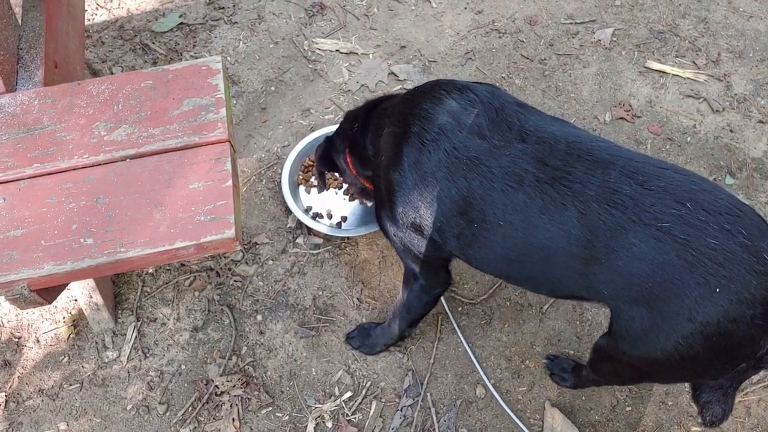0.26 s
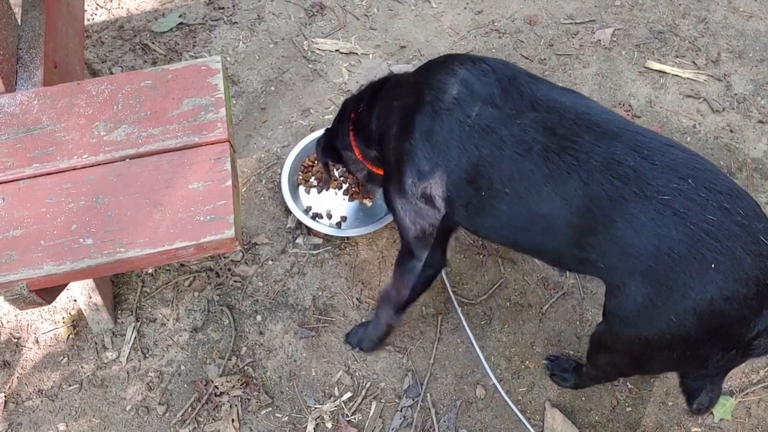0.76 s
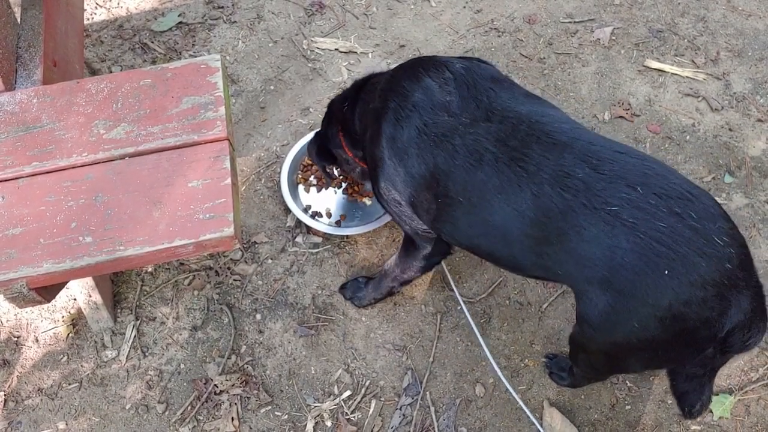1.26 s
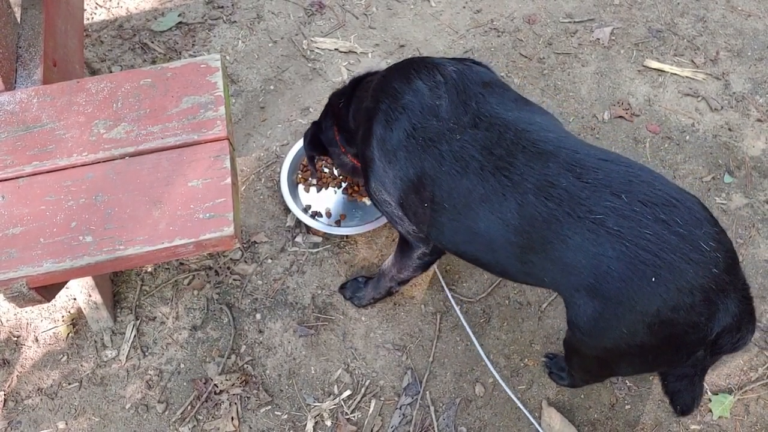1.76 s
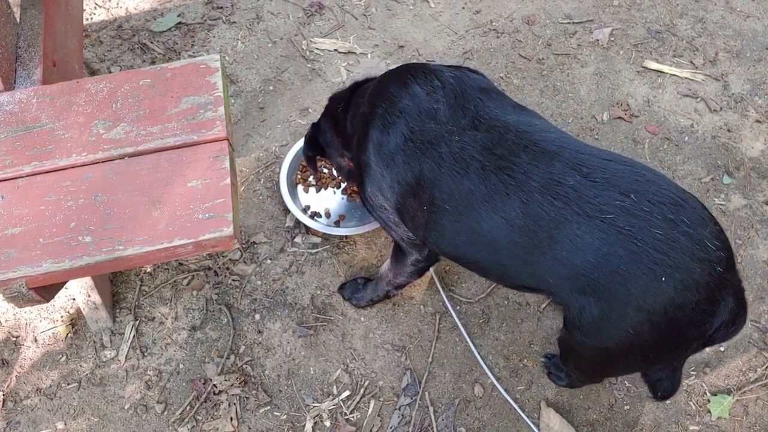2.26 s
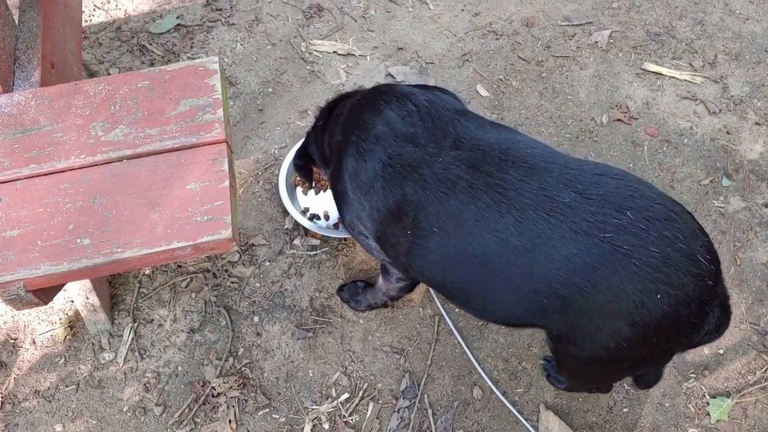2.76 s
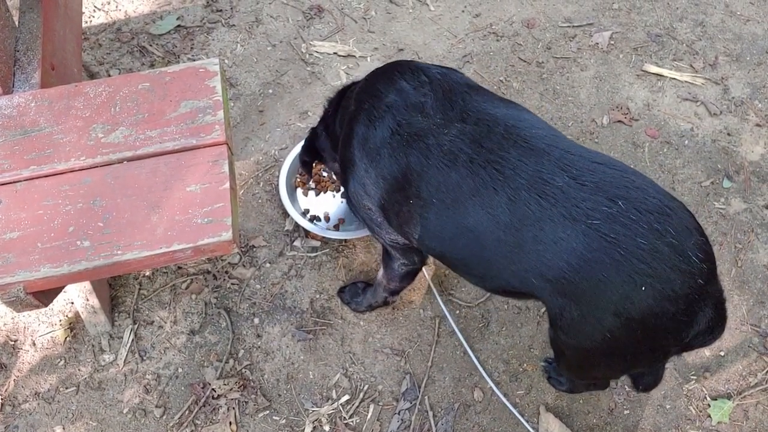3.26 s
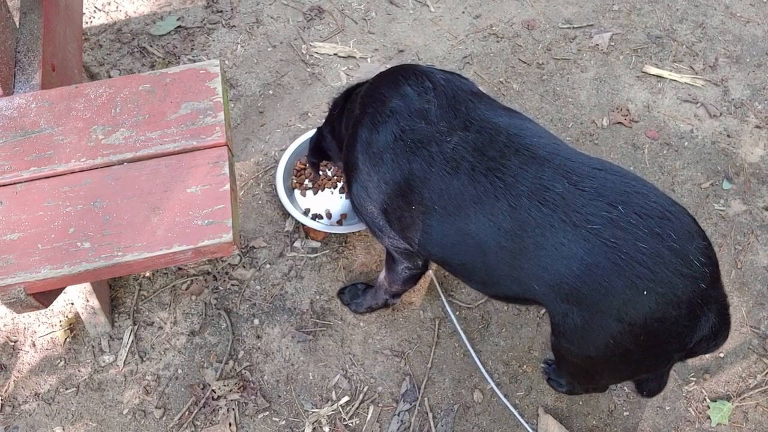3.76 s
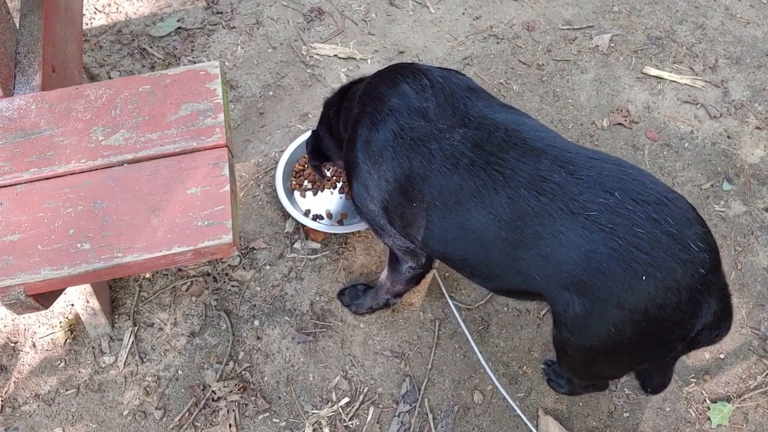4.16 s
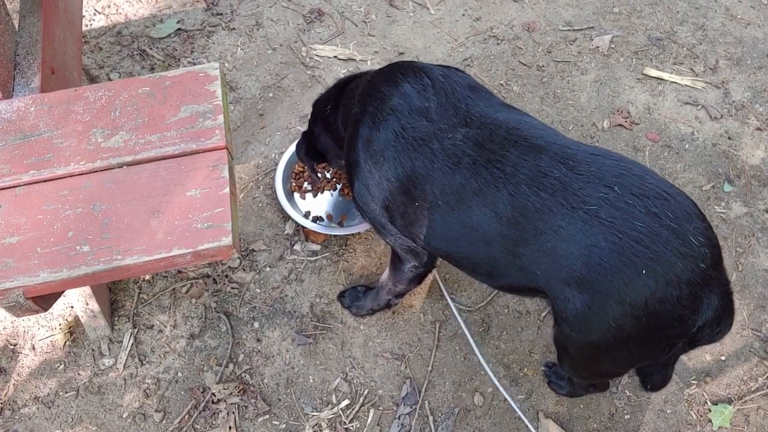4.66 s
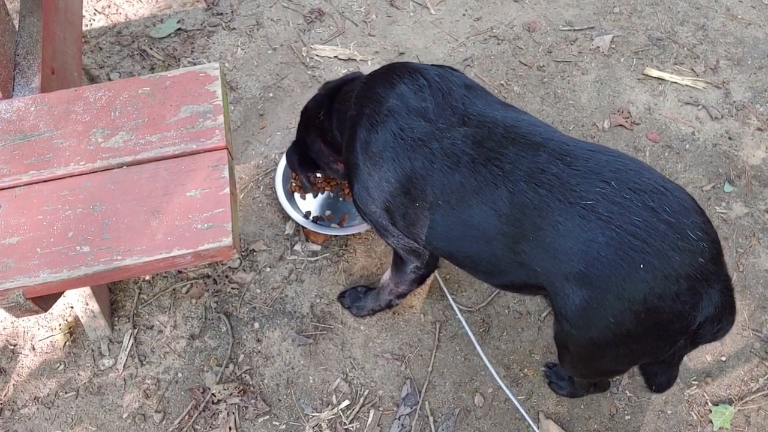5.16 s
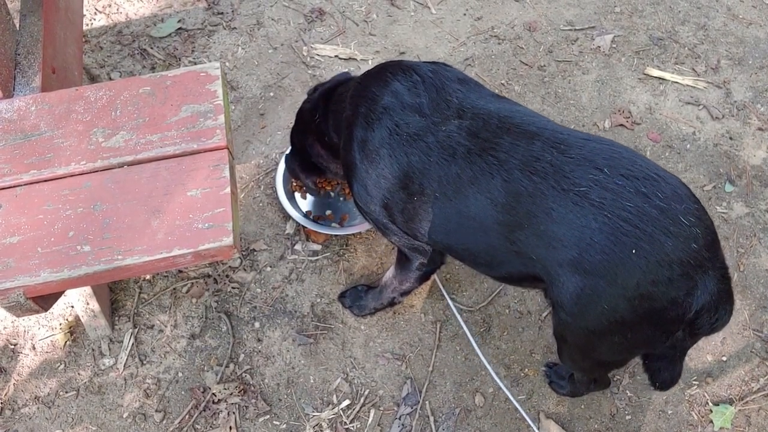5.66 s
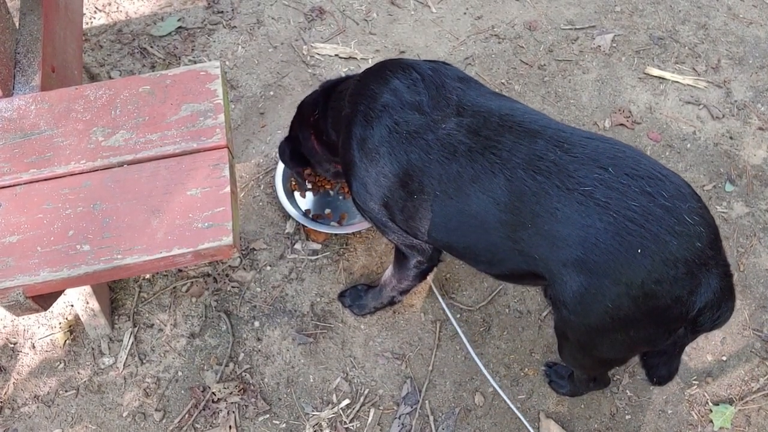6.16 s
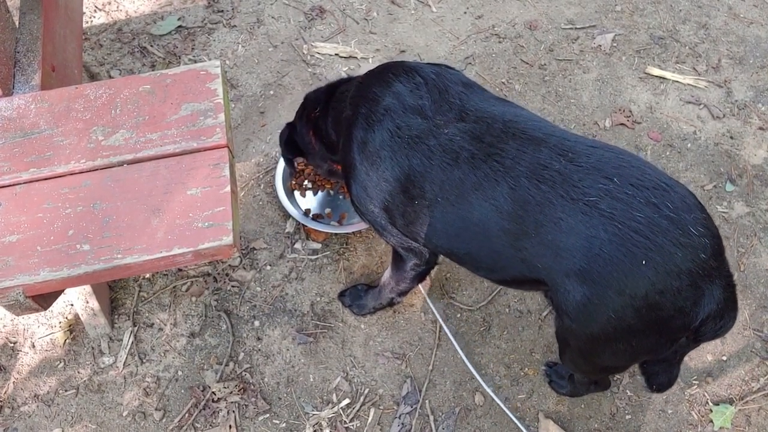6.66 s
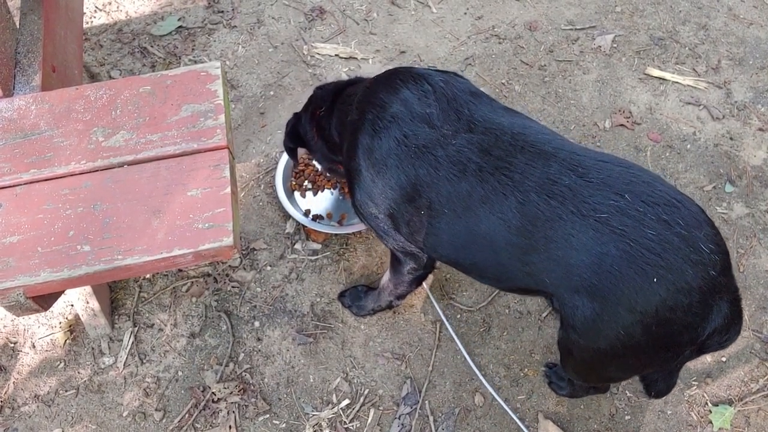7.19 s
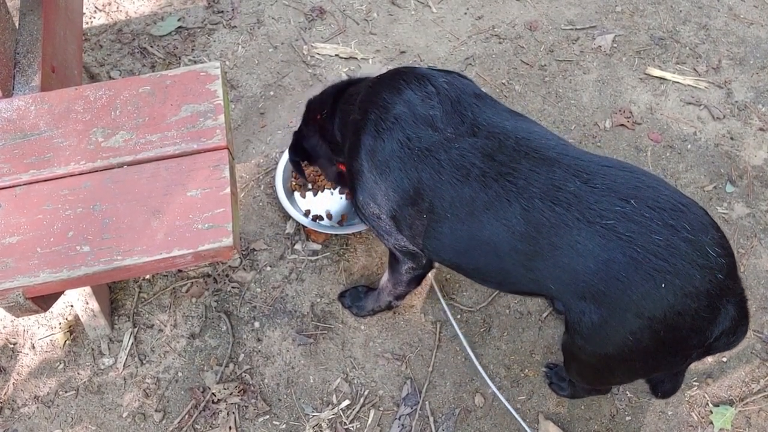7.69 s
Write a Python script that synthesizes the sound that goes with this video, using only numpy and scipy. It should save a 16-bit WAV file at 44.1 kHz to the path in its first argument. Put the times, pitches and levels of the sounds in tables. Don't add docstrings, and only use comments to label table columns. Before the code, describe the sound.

Sharp, irregular kibble crunches ring hollowly in a metal dish outdoors, then the bowl scrapes soil over soft insect hiss and distant traffic.

```python
import sys
import numpy as np
from scipy import signal
from scipy.fft import rfft, irfft, next_fast_len
from scipy.io import wavfile
from scipy.ndimage import uniform_filter1d, map_coordinates

SR = 44100
rng = np.random.default_rng(int(sys.argv[2]) if len(sys.argv) > 2 else 0)


def generate_wav(sig):
    pcm = np.round(np.clip(np.atleast_2d(sig).T, -1, 1) * 32767).astype(np.int16)
    wavfile.write(sys.argv[1], SR, pcm)


def rack_gain(trim_db):
    fader = np.asarray(trim_db, float)
    return 10 ** (fader / 20)


N = 349713

# resonance in Hz, width in Hz, level in dB.
DEEP = [(1036, 236, 2)]
MIDDLE = [(1622, 380, 0)]
UPPER = [(1940, 260, 3.5), (2600, 1430, -9.5)]
# Hz, width in Hz, level in dB.
SNAP = [(6650, 1920, 0)]
TOP = [(9400, 10000, 0)]


def unit(x):
    return x / np.sqrt(np.mean(x ** 2) + 1e-20)


def along(points, hz):
    f, v = np.transpose(points)
    return np.interp(np.log(hz + 1), np.log(f + 1), v)


def curve(rows):
    s, db = np.transpose(rows)
    return np.interp(np.arange(N) / SR, s, db, left=-120, right=-120)


def wobble(rate, count=N):
    knots = rng.standard_normal(int(count * rate / SR) + 4)
    return map_coordinates(knots, [np.arange(count) * rate / SR])


def filtered(x, response):
    m = next_fast_len(N + SR // 10)
    return irfft(rfft(x, m) * response(np.fft.rfftfreq(m, 1 / SR)), m)[..., :N]


def modal(hz, modes):
    total = 0
    for k, (centre, width, db) in enumerate(modes):
        peak = 1j * hz * width / (centre * centre - hz * hz + 1j * hz * width)
        total = total + (-1) ** k * rack_gain(db / 2) * peak
    return total ** 2


def resonate(x, modes):
    return filtered(x, lambda hz: modal(hz, modes))


def bursts(s, db, shapes):
    at = np.round(s * SR).astype(int)[:, None] + np.arange(shapes.shape[1])
    return np.bincount(at.ravel(), (rack_gain(db)[:, None] * shapes).ravel(), N + SR)[:N]


def splinters(s, quick_s, slow_s, after_db):
    t = np.arange(SR // 40) / SR
    draw = rng.standard_normal((len(s), 2, len(t)))
    edge = rack_gain(-12.5 - 60 * t / quick_s) * draw[:, 0]
    chips = rack_gain(after_db - 60 * t / slow_s) * draw[:, 1] ** 3
    burst = edge + chips
    burst[:, 0] = 1
    return burst


def voiced(s, shapes, *layers):
    m = next_fast_len(N + SR // 10)
    hz = np.fft.rfftfreq(m, 1 / SR)
    total = 0
    for k, (db, modes) in enumerate(layers):
        total = total + (-1) ** k * rfft(bursts(s, db, shapes), m) * modal(hz, modes)
    return irfft(total, m)[:N]


def cracks(rows):
    s, db, deep_db, upper_db = np.transpose(rows)
    shapes = splinters(s, quick_s=0.0017, slow_s=0.056, after_db=-37.5)
    return voiced(s, shapes, (db + deep_db + 27.5, DEEP), (db + 16.5, MIDDLE), (db + upper_db + 23.0, UPPER))


def snaps(rows, quick_s):
    # resonance in Hz, width in Hz, level in dB.
    lower_edge = [(3830, 4000, 0)]
    s, db, edge_db, top_db = np.transpose(rows)
    shapes = splinters(s, quick_s, slow_s=0.024, after_db=-40.0)
    return voiced(s, shapes, (db + edge_db + 22.5, lower_edge), (db + 15.5, SNAP), (db + top_db + 11.0, TOP))


def bumps(rows):
    # resonance in Hz, width in Hz, level in dB.
    soil = [(740, 560, 0)]
    bottom = [(285, 350, 0)]
    s, db, bottom_db = np.transpose(rows)
    shapes = splinters(s, quick_s=0.014, slow_s=0.082, after_db=-34.5)
    return voiced(s, shapes, (db + 24.0, soil), (db + bottom_db + 35.0, bottom))


def rim(rows):
    # note in Hz, level in dB, time to fall 60 dB in seconds.
    spots = [
        [(893, -0.5, 0.14), (990, -0.5, 0.24), (816, -10, 0.26), (1496, -2.5, 0.18), (1880, 1, 0.17)],
        [(530, 9, 0.02), (580, -16, 0.16), (1133, 5.5, 0.2), (1280, 19.5, 0.021), (1810, 11, 0.022),
         (1940, -2, 0.21), (2100, -16, .05)],
        [(250, 5, 0.066), (850, 7, 0.07), (1670, 30, 0.011), (2350, 10.5, 0.035), (1900, 6, 0.046)],
        [(2280, -2, 0.023), (2560, 17, 0.017), (2900, 9.5, 0.027)],
        [(1190, 7.5, 0.24), (1840, 20, 0.11), (580, 8, .05)],
        [(3030, 5, 0.17), (3149, -8, .1)],
        [(3000, 9, 0.051)],
    ]
    out, t = np.zeros(N + SR), np.arange(SR // 3) / SR
    for s, db, spot in rows:
        for hz, level, t60 in spots[spot]:
            touch = wobble(78, count=len(t))
            loudness = rack_gain(db + level + 2.2 * touch - 60 * t / t60)
            ring = loudness * np.sin(2 * np.pi * (hz * t + rng.random()) + .6 * touch)
            out[round(s * SR):][:len(t)] += ring * (1 - np.exp(-t / 0.00076))
    return out[:N]


def blows(from_right):
    right_times = [
        (5.645, 5.66),
        (7.0, 7.03),
    ]
    # start in seconds, peak in dB,
    # deep and upper hollow in dB relative to the peak.
    hard_bites = [(0.1421, -15.5, -10, -14), (0.4, -34, 2, 10), (0.5811, -10.5, -12, -6.5),
                  (0.8886, -24.5, 0.5, -6), (1.2381, -23.5, -5.5, -6), (1.5858, -13, -11, -5.5),
                  (2.0273, -10.5, -9.5, -4.5), (2.1565, -17.5, -25, -5.5), (2.2088, -21.5, -6, -2),
                  (3.5663, -17.5, -9, -7.5), (3.6162, -21, -6, -4), (4.1165, -17, -26, -16),
                  (4.1954, -9.5, -16.5, -18), (4.6124, -18.5, -3.5, -6.5), (4.8522, -11.5, -17, -39),
                  (4.9927, -10.5, -10, -17), (5.0012, -8.5, -10, -10), (5.0212, -11, -7.5, -12),
                  (5.072, -16.5, -5, -27), (5.5211, -15, -14.5, -15), (5.6531, -16, -3.5, -41),
                  (5.693, -21.5, -3.5, -4), (5.718, -11.5, -17, -10), (5.7606, -8, -19.5, -19),
                  (6.061, -16, -8.5, -5), (6.1931, -8.5, -29, -8.5), (6.3126, -9.5, -25, -29),
                  (6.3365, -13, -14, -16), (7.0097, -25.5, 2, -3), (7.197, -15.5, -32, -5.5)]
    # start in seconds, peak in dB.
    nips = [(1.6541, -32), (.6025, -24), (.8215, -18), (1.1558, -20.5), (1.2845, -15.5), (1.485, -26.5),
            (2.58, -36), (3.675, -26), (4.0118, -23.5), (4.151, -37), (4.572, -19.5), (4.755, -18.5),
            (5.0474, -16), (5.2722, -21.5), (5.639, -23), (5.7418, -14), (5.8912, -20), (6.0192, -18),
            (6.393, -27), (6.4238, -28), (6.5091, -26), (6.6096, -18.5), (7.0454, -29), (7.0828, -30),
            (7.097, -29), (7.1242, -22), (7.234, -24), (7.2675, -21.5), (7.3092, -29)]
    chips = [(1.2534, -24), (1.3374, -30), (2.5616, -29), (3.1323, -36), (4.1314, -16), (4.4119, -31),
             (4.4937, -27), (4.5111, -31), (4.6478, -29), (4.9838, -22), (5.0099, -21), (5.026, -34),
             (5.562, -26), (5.5972, -27), (5.6196, -27), (5.7724, -21), (6.0674, -9.5), (6.208, -14),
             (6.3474, -16), (6.3712, -20), (7.2114, -24), (7.2454, -37), (7.3886, -39), (2.45, -34),
             (2.588, -24), (4.142, -37), (4.148, -22), (5.755, -33), (7.46, -46), (6.328, -20)]
    drops = [(.0807, -25.5), (.0962, -22.5), (.7996, -33.5), (.9298, -32), (.9747, -37), (1.064, -28),
             (1.0914, -29), (1.2072, -32), (1.3114, -31), (1.4546, -27), (1.5025, -34), (.4309, -23),
             (1.7903, -33), (1.8557, -33), (1.9565, -35), (2.0642, -31.5), (2.1096, -38), (2.2653, -35),
             (3.3069, -34), (3.3857, -41), (3.4526, -46), (3.5897, -27), (4.8282, -25), (4.838, -31),
             (4.897, -33), (4.964, -28.5), (5.1033, -23), (5.5056, -49), (6.0419, -32), (6.6528, -37.5)]
    flicks = [(.0687, -30), (.3855, -35), (.6489, -30), (.7357, -30), (1.7155, -34.5), (1.8851, -32),
              (1.9126, -33.5), (2.8863, -34), (2.9966, -31), (3.7369, -31.5), (3.9843, -32),
              (4.5352, -28.5), (5.4201, -34), (5.8301, -31.5), (5.9137, -25), (5.9475, -26), (5.9958, -34),
              (6.1409, -36), (7.7767, -45), (7.7942, -36.5), (7.888, -36)]
    rim_taps = [(.412, -50), (.555, -55), (.757, -55), (.6853, -61), (.879, -63), (1.4187, -54),
                (2.222, -41.5), (2.3436, -55), (2.3685, -55), (2.434, -55), (4.4458, -53), (4.4524, -51),
                (5.442, -51.5), (7.871, -62)]
    nip_colour = (-15, -15.5)
    chip_colour = (-20.5, -9)
    drop_colour = (-3.2, -9)
    flick_colour = (-10.5, 0.4)
    tap_colour = (-22, 19.2)
    # start in seconds, peak in dB, bottom in dB relative to it.
    foot_bumps = [(2.1563, -26, -14), (2.2088, -28, -19.5), (2.221, -36, -42), (5.506, -45, -8),
                  (5.652, -38, -28), (5.834, -41.5, -15), (6.743, -29, -21), (6.799, -37.5, -13),
                  (6.81, -45, -20), (7.0097, -41, -5), (7.097, -31.5, -17), (7.156, -40.5, -1),
                  (7.195, -29.5, -9), (7.209, -29, -32), (7.246, -38, -12)]
    # start in seconds, peak in dB, lower edge and top in dB relative to it.
    pellet_snaps = [(0.5821, -31.5, -18, -23), (0.891, -25.5, -28, -22), (1.5874, -24, -25, -14),
                    (2.028, -39, -10, -18), (2.2094, -42, -15, 0), (2.9985, -31, -13, -14),
                    (3.566, -30.5, -15, -20), (4.117, -26, -22, -26), (5.022, -43, -17, 1),
                    (5.6526, -38.5, -3, 3), (6.0604, -33, -24, -27.5), (6.337, -52, 8, -19),
                    (7.0102, -34, 5, -4), (7.1965, -40.5, -21, -4)]
    # start in seconds, level in dB, number of the struck spot.
    rim_blows = [
        (.8886, -40, 3),
        (2.214, -43, 3),
        (2.997, -45, 0),
        (5.506, -55, 4),
        (5.653, -38, 1),
        (7.0097, -46, 2),
    ]

    def pick(rows):
        return [r for r in rows if any(a < r[0] < b for a, b in right_times) == from_right]

    kinds = [(nips, nip_colour), (chips, chip_colour), (drops, drop_colour), (flicks, flick_colour),
             (rim_taps, tap_colour)]
    breaks = hard_bites + [(s, db, *colour) for rows, colour in kinds for s, db in rows]
    clicks = snaps(pick(pellet_snaps), quick_s=.0012 if from_right else .015)
    return cracks(pick(breaks)) + bumps(pick(foot_bumps)) + clicks + rim(pick(rim_blows))


def ticks(rows, t60):
    s, db, hz = np.transpose(rows)
    t, draw = np.arange(SR // 40) / SR, rng.standard_normal((len(s), 3, 1))
    turn = 2 * np.pi * hz[:, None] * t
    overtone = rack_gain(-18.5 + 6.4 * draw[:, 0]) * np.sin(1.633 * rack_gain(draw[:, 1]) * turn)
    note = np.sin(turn) + overtone
    return bursts(s, db - 2.5, note * rack_gain(-60 * t / t60) * (1 - np.exp(-t / 0.00048)))


def crumbs():
    # start in
    # seconds, peak in dB, note in Hz.
    crumb_notes = [(0.053, -56, 2050), (0.12, -47, 1050), (0.167, -42, 1030), (0.181, -54, 2860),
                   (0.237, -49, 2040), (0.289, -49, 969), (0.34, -45, 1170), (0.391, -37, 2100),
                   (0.406, -29, 2280), (0.418, -41, 1060), (0.449, -49, 1010), (2.961, -49, 2360),
                   (3.132, -45, 1480), (3.397, -38, 1080), (3.407, -37, 1530), (3.412, -35, 2350),
                   (3.424, -43, 1010), (3.436, -44, 1030), (3.464, -37, 2640), (3.475, -40, 1100),
                   (3.522, -49, 2880), (3.548, -40, 1090), (3.577, -35, 1080), (3.627, -36, 1070),
                   (3.637, -34, 1540), (3.694, -36, 1570), (3.708, -41, 2020), (3.798, -44.5, 1700),
                   (3.941, -41.5, 676), (3.989, -41, 2070), (4.093, -49, 1980), (4.221, -38, 1570),
                   (4.244, -39, 1950), (4.293, -43, 2000), (4.333, -42.5, 1010), (4.454, -45, 2060),
                   (5.577, -41, 2000), (5.805, -38, 1570), (5.845, -32.5, 1660), (5.863, -40, 1630),
                   (5.901, -33, 1600), (5.931, -34, 1010), (5.976, -42, 1780), (6.001, -34, 1060),
                   (6.019, -28, 1560), (6.077, -34, 1570), (6.807, -28.5, 680), (7.06, -43, 1870),
                   (7.098, -35, 740), (7.106, -29.5, 720), (7.139, -40, 1820), (7.157, -38, 330),
                   (7.247, -33, 1880), (7.293, -43, 2000), (7.451, -48, 1690), (7.471, -46, 1560),
                   (0.385, -36, 2230), (0.397, -29.5, 2410), (0.412, -34, 1030), (.4312, -36, 1170),
              (0.685, -37, 2260), (1.046, -44, 1040), (1.439, -38, 1480), (1.531, -43, 1100),
              (1.678, -42.5, 1170), (1.715, -41, 1960), (1.817, -45, 1830), (1.833, -41, 2010),
              (1.867, -37, 1940), (2.209, -18.5, 850), (2.165, -40, 865), (2.2205, -26, 740),
              (2.344, -34.5, 2280), (2.368, -34, 2330), (2.511, -51, 1070), (2.58, -30, 1940),
              (2.95, -44, 1900), (4.412, -38, 2000), (4.542, -38, 2010), (4.586, -37, 1040),
              (4.767, -41, 1000), (4.782, -42, 1040), (4.835, -28, 997), (4.844, -31, 1070),
              (4.949, -43, 1040), (5.157, -45, 980), (6.275, -50, 627), (6.496, -38, 1720),
              (6.617, -36, 1660), (6.7425, -27.5, 703), (6.744, -30.5, 1480), (6.752, -44, 708),
              (6.758, -31, 710), (6.744, -43, 2450), (4.453, -40, 750), (1.346, -40, 1600),
              (1.217, -43, 1150), (6.799, -35.5, 2060), (6.808, -34.5, 1970), (7.127, -34, 330),
              (7.153, -44, 2630), (7.16, -44, 2600), (7.051, -42, 250), (7.074, -41, 250),
              (5.097, -33, 1450), (5.067, -36, 1830), (7.161, -51, 735), (7.388, -49, 1950)]
    punches = [(0.1426, -24, 1510), (0.5811, -14, 1685), (0.8878, -17.5, 2440), (1.1567, -34, 1700),
               (1.2393, -24, 1950), (1.2537, -28, 1490), (1.5861, -26, 1940), (1.5866, -29, 2800),
               (2.0278, -28, 2820), (2.0273, -18, 1460), (3.5669, -26, 1310), (3.59, -27, 1300),
               (3.617, -24, 1380), (4.1166, -14.5, 1900), (4.152, -25, 1600), (4.1952, -17, 1980),
               (4.6127, -27, 1990), (4.7535, -24.5, 1970), (5.0011, -17.5, 1210), (5.0014, -24, 2520),
               (5.0216, -7.5, 1780), (5.0722, -14.5, 1900), (5.5194, -17, 1930), (5.5244, -21, 1900),
               (5.7173, -13.5, 1630), (5.7423, -13, 1660), (5.7545, -17.5, 1880), (5.76, -19, 1950),
               (5.773, -20.5, 1960), (6.0608, -19, 1630), (6.0674, -15, 1670), (6.193, -18, 1740),
               (6.3132, -22, 1680), (6.3365, -12.5, 1700), (6.5092, -23.5, 1850), (7.1971, -46, 2010)]
    return ticks(crumb_notes, t60=0.024) + rack_gain(3) * ticks(punches, t60=0.0075)


def grains(rate, spread_db, clump_db):
    hit = rng.random(N) < rate * rack_gain(clump_db * wobble(30)) / SR
    sizes = rack_gain(spread_db * np.minimum(rng.exponential(size=N), 3))
    return unit(hit * rng.standard_normal(N) * sizes)


def rattle():
    # centre in seconds, length in seconds, level and brightness in dB.
    ploughs = [(0.075, 0.12, -59.5, 3), (0.368, 0.067, -57, 0), (0.406, 0.052, -51, 3),
               (0.6, 0.067, -54, -15), (0.756, 0.13, -59, -8), (1.277, 0.23, -62, -14),
               (1.487, 0.17, -58, -12), (1.88, 0.15, -57.5, -6), (2.036, 0.13, -68, -1),
               (2.405, 0.19, -67, 0), (2.962, 0.079, -68, 6), (3.419, 0.14, -53, -4),
               (3.481, 0.096, -55, -8), (3.55, 0.056, -56, -1), (3.584, 0.067, -49.5, 2),
               (3.683, 0.17, -53, -6), (4, 0.16, -62, 2.5), (4.136, 0.08, -49.5, 2.5),
               (4.48, 0.48, -63, -1.5), (4.575, 0.15, -54, -2), (4.84, 0.085, -59, 2),
               (4.955, 0.34, -61.5, -5), (5.044, 0.1, -61, -14), (5.073, 0.028, -46, 0),
               (5.97, 0.41, -57, -7), (6.412, 0.079, -63, 0)]
    # centre in seconds, level in dB.
    spills = [(.177, -60), (0.9, -48.5), (1.08, -49), (1.164, -47.5), (1.597, -45), (2.218, -47),
              (2.585, -59), (3.633, -48), (5.525, -56), (6.069, -40), (6.205, -37.5), (6.343, -65)]
    t = np.arange(N) / SR
    dull, bright = np.full(N, rack_gain(-71.0)), np.full(N, rack_gain(-74.5))
    short_spills = [(s, 0.034, db, -6.5) for s, db in spills]
    for s, length, db, bright_db in ploughs + short_spills:
        near = slice(max(round((s - length) * SR), 0), round((s + length) * SR))
        swell = rack_gain(db) * np.exp(-(2.77 * (t[near] - s) / length) ** 4)
        dull[near] += swell
        bright[near] += rack_gain(bright_db) * swell
    impacts = grains(700, spread_db=2.6, clump_db=3)
    return dull * unit(resonate(impacts, DEEP + MIDDLE)) + bright * unit(resonate(impacts, UPPER))


def scrapes():
    # time in seconds, level in dB.
    drags = [
        [(5.6, -62), (5.664, -46.5), (5.79, -54.5), (5.81, -70), (5.872, -48.5), (6.0, -59)],
        [(7.01, -62), (7.04, -50.5), (7.085, -47), (7.1, -44.5), (7.155, -44), (7.165, -57), (7.225, -59),
         (7.25, -60), (7.28, -58), (7.31, -52), (7.33, -73)],
    ]
    # resonance in Hz, width in Hz, level in dB.
    rasp_modes = [(1450, 200, 8.2), (1830, 240, 13), (2460, 830, 1.1), (3300, 590, 1)]
    grind_modes = [(250, 190, 6), (720, 250, -2)]
    grind_levels = [-20, -9]
    rasp = unit(resonate(grains(2800, spread_db=1.8, clump_db=1.6), rasp_modes))
    grind = unit(resonate(grains(900, spread_db=2.4, clump_db=3), grind_modes))
    return sum(rack_gain(curve(rows)) * (rasp + rack_gain(db) * grind) for rows, db in zip(drags, grind_levels))


def gulps():
    # start in seconds, level in dB, pitch in Hz.
    swallows = [
        (0.46, -61, 243),
        (0.75, -52.5, 268),
        (5.6, -50.5, 273),
        (5.615, -47.5, 324),
    ]
    out, t = np.zeros(N + SR), np.arange(SR // 20) / SR
    for s, db, hz in swallows:
        note = np.sin(2 * np.pi * hz * t * (1 - 3.9 * t))
        out[round(s * SR):][:len(t)] += rack_gain(db) * np.hanning(len(t)) * note
    return out[:N]


def snorts():
    # centre in seconds, length in seconds, level in dB.
    breaths = [
        (2.373, 0.065, -60.5),
        (3.582, .07, -57.5),
    ]
    t = np.arange(N) / SR
    puffs = sum(rack_gain(db) * np.exp(-(2.1 * (t - s) / length) ** 4) for s, length, db in breaths)
    return puffs * unit(resonate(rng.standard_normal(N), SNAP + TOP))


def placed(x, lag_s, scatter_db):
    t = np.arange(SR // 30) / SR
    echoes = rng.standard_normal((2, len(t))) * rack_gain(-60 * t / 0.06) * (t > .001)
    wet = signal.fftconvolve(x[None], echoes / np.linalg.norm(echoes[0]), axes=1)[:, :N]
    wet = filtered(wet, lambda hz: 1 / (1 + 1j * hz / 5270) ** 2)
    sides = np.array([[1], [-1]])
    direct = filtered(np.array([x, x]), lambda hz: np.exp(-1j * np.pi * hz * lag_s * sides))
    return direct + rack_gain(scatter_db) * wet


def rush(spectrum, patchy_db):
    # frequency in Hz, likeness from -1 to 1.
    likeness = [(60, 0.94), (130, 0.74), (280, 0.42), (600, 0.46), (1280, -0.56), (2750, -0.078),
                (5900, 0.016), (7200, 1), (12000, -0.88)]
    z = signal.stft(rng.standard_normal((2, N + 512)), nperseg=512)[2]
    field = uniform_filter1d(uniform_filter1d(rng.standard_normal(z.shape[1:]), 6, 0), 10, 1)
    pair = signal.istft(z * rack_gain(patchy_db * unit(field)), nperseg=512)[1][:, :N]

    def response(hz):
        angle = np.arccos(np.clip(along(likeness, hz), -1, 1)) / 2
        return rack_gain(along(spectrum, hz)) * [np.cos(angle), np.sin(angle)]

    mid, side = filtered(pair, response)
    return unit(np.array([mid + side, mid - side]))


def outdoors():
    # frequency in Hz, dB per Hz.
    insects = [(1590, -21.5), (2700, -7), (3570, 1), (4000, -3), (4690, -2.5), (5430, -5.5), (5970, -5.5),
               (6730, -2), (7130, -7), (7640, -13), (9600, -18.5), (10600, -23.5), (11700, -17.5),
               (12300, -26), (16000, -71), (22000, -120)]
    soft_air = [(82, -6.5), (140, -6.5), (324, -8.5), (873, -7.5), (1340, -14), (2050, -18.5), (2180, -38),
                (2800, -49), (3640, -45), (6160, -120)]
    traffic = [(12, -51), (24, -12), (44, -4), (70, 0.5), (86, -4), (102, -10), (129, -7), (146, -30),
               (170, -22), (220, -24), (370, -120)]
    # time in seconds, level in dB.
    insect_level = [(0.0, -51.5), (0.29, -51), (3.53, -52), (4.09, -51), (7.05, -52), (7.53, -53.5),
                    (7.93, -52)]
    hiss = rack_gain(curve(insect_level) + 2.0 + 0.13 * wobble(8.1)) * rush(insects, patchy_db=0.92)
    air = rack_gain(-60 + 0.22 * wobble(2.3)) * rush(soft_air, patchy_db=1.2)
    rumble = rack_gain(-53.5 + 2.3 * wobble(2.3)) * rush(traffic, patchy_db=-0.07)
    return hiss + air + rumble


def scene():
    # start in seconds, level in dB, number of
    shivers = [
        (5.654, -44, 5),
        (7.011, -35, 6),
    ]
    top_hz = 12300
    eating = blows(from_right=False) + rim(shivers) + crumbs() + rattle() + scrapes() + gulps() + snorts()
    bowl = placed(eating, lag_s=-.00003, scatter_db=-11)
    knocks = placed(blows(from_right=True), lag_s=.00051, scatter_db=-10)
    pan_db = 2.5 * np.array([[.5], [-.5]])
    knocks = filtered(knocks, lambda hz: rack_gain(7.5 - 20 * (hz > top_hz) + pan_db))
    return filtered(bowl + outdoors(), lambda hz: hz < top_hz) + knocks


def thin_treble(x):
    # frequency in Hz, share from 0 up.
    kept_sum = [(9300, 1), (10300, .75), (12300, .55)]
    kept_difference = [(6850, 9), (6900, .42), (7600, .3), (9600, .27), (12300, .17)]
    hz, _, z = signal.stft([x[0] + x[1], x[0] - x[1]], SR, nperseg=2048)
    band = np.arange(len(hz)) // np.array([[10], [32]])
    dice = rng.random((len(hz), z.shape[2]))[band]
    dice[1] = dice[1] / 2 + uniform_filter1d(dice[0, 0], size=3) - .25
    share = np.array([along(kept_sum, hz), along(kept_difference, hz)])[..., None]
    treble = abs(z[:, hz > 7000]).sum(axis=(0, 1))
    dropped = (dice > share) & (treble < 1.6 * np.median(treble))
    dropped[1] |= dropped[0]
    mid, side = signal.istft(z * ~dropped, SR, nperseg=2048)[1][:, :N] / 2
    return np.array([mid + side, mid - side])


def low_pass(x):
    return signal.sosfilt(signal.butter(12, 16300, fs=SR, output="sos"), x)


def record(dry):
    # frequency in Hz, left over right in dB.
    port_colour = [(100, 1), (360, -1), (650, -6.5), (1100, -3.5), (1550, 2), (2130, 7), (2900, 3.5),
                   (3900, -3), (7000, 5), (12000, 1)]
    x = filtered(dry, lambda hz: rack_gain(along(port_colour, hz) * np.array([[.5], [-.5]])))
    return low_pass(thin_treble(x))


dry = scene()
out = record(dry)
generate_wav(out)
```